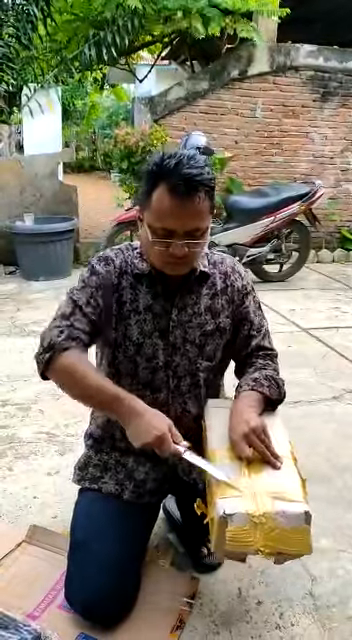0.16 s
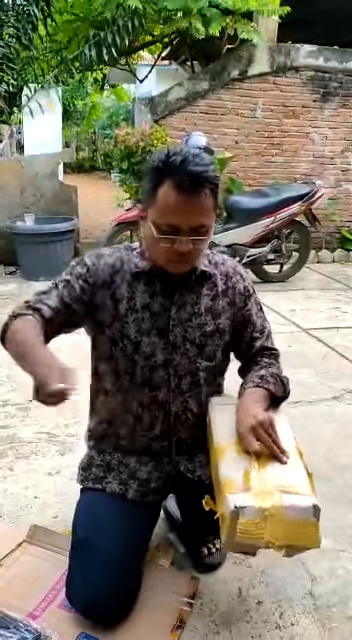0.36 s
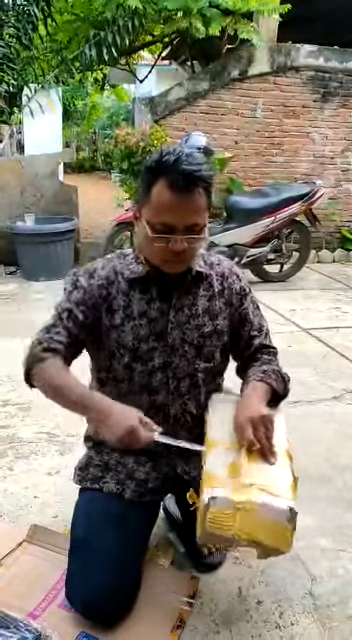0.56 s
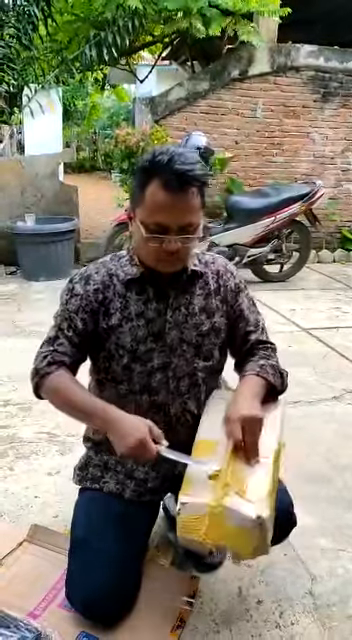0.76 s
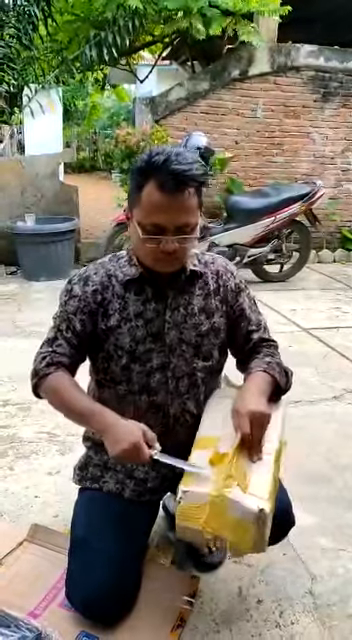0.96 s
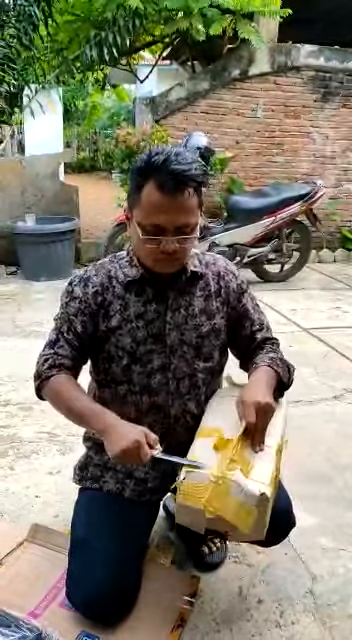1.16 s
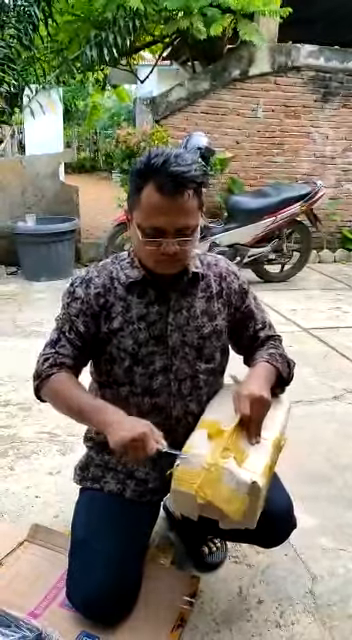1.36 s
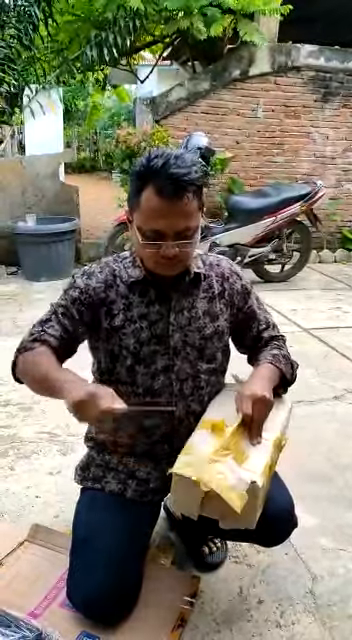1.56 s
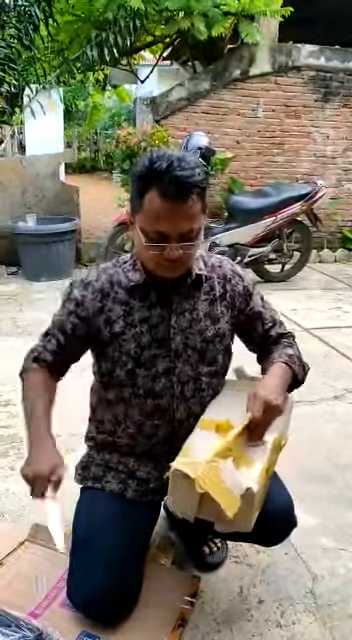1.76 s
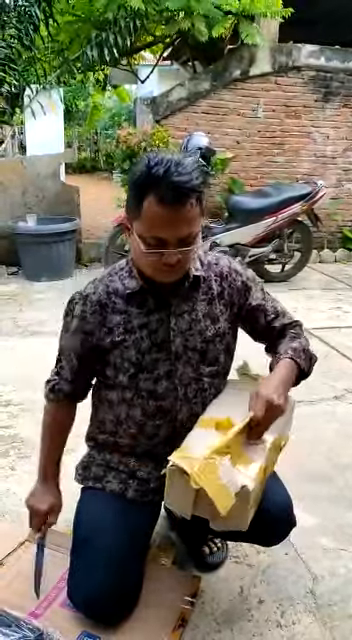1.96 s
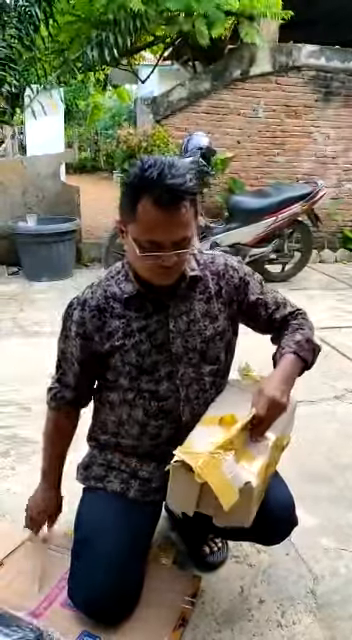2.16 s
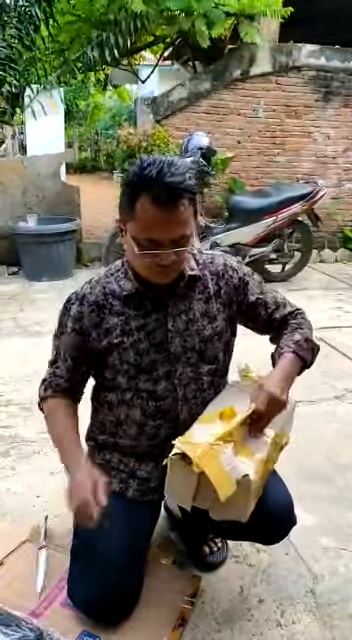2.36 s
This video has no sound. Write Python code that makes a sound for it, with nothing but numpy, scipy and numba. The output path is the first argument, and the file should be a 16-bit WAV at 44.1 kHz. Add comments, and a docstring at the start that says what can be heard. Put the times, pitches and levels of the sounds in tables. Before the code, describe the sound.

Close stereo pickup in a quiet walled yard: a blade slits box tape with a sharp hollow crack, then two lesser rasps and pops; loose tape crinkles, and the knife clacks onto cardboard.

```python
"""Small walled yard: a knife saws through the tape of a cardboard parcel in three strokes.
Filtered micro-clicks make the rasp; click-and-noise bursts make the snaps, which thump the box.
Between the strokes loose tape crinkles (sparser clicks) and flicks (short noise bursts); the box scuffs.
Then the knife goes down on flat cardboard: dull knocks of damped sines with grit.
Near scatter and wall echo are decaying noise; faint air and a low rumble lie beneath."""
import sys
import numpy as np
from scipy import signal
from scipy.fft import rfft, irfft
from scipy.io import wavfile
from scipy.ndimage import uniform_filter1d
from numba import njit

SR = 44100
rng = np.random.default_rng(int(sys.argv[2]) if len(sys.argv) > 2 else 0)


def to_wav(s):
    """Save 16-bit WAV."""
    ch = np.atleast_2d(s).T  # columns
    pcm = np.round(np.clip(ch, -1, 1) * 32767)  # PCM
    wavfile.write(sys.argv[1], SR, pcm.astype(np.int16))


N = 110250

# relative spectrum of the stiff board: f/Hz, level/dB
PANEL = [(40, -54.5), (150, -23.5), (400, -3), (560, -12.5), (780, 2), (1000, 0), (1270, 3.5), (1700, -9.5),
         (2200, -4), (3000, -9), (4200, -17), (16000, -49)]
# relative spectrum of the tape: f/Hz, level/dB
TAPE = [(200, -46.5), (1200, -11.5), (3200, -6), (4000, -11.5), (4600, -6.5), (5400, -3), (6700, 1),
        (8000, 4), (9500, -7.5), (11500, -18), (15600, -16)]
# relative spectrum of rubbed tape, its lower colour: f/Hz, level/dB
RUB = [(200, -13), (700, -28.5), (1200, 1.5), (2200, 2.5), (3000, -7.5), (4300, -8.5), (16000, -36.5)]
CUT_GRAINS_PER_S, CUT_SCATTER_DB = 5000, 4
BASS_CUT_HZ = 230  # for knocks (flat board radiates little below this) and the ring of the pops


def undb(db):
    """Decibels to gain."""
    return 10 ** (np.asarray(db) / 20)


def unit(x):
    """Scale to an rms of 1."""
    return x / np.sqrt(np.mean(x ** 2))


def along(hz, table, axis=1):
    """Read a table column on a log-frequency axis."""
    table = np.array(table, float)
    return np.interp(np.log(hz + 1), np.log(table[:, 0]), table[:, axis])


def response(points, size=2048):
    """Minimum-phase impulse response of a spectrum, by folding its cepstrum."""
    hz = np.fft.rfftfreq(size, 1 / SR)
    cepstrum = irfft(np.log(undb(along(hz, points))))
    cepstrum[1:size // 2] *= 2
    cepstrum[size // 2 + 1:] = 0
    return irfft(np.exp(rfft(cepstrum)))


def through(x, ring):
    """Convolve with a response scaled to unit energy."""
    return signal.oaconvolve(x, ring / np.linalg.norm(ring))[:N]


def high_pass(x, hz):
    """Third-order bass cut."""
    return signal.sosfilt(signal.butter(3, hz, "high", fs=SR, output="sos"), x)


def modes(rows):
    """Sum of decaying sines from rows of f/Hz, level/dB, t60/s."""
    t = np.arange(SR // 5) / SR
    return sum(undb(db) * np.sin(2 * np.pi * hz * t) * np.exp(-np.log(1000) * t / t60)
               for hz, db, t60 in rows)


def add(out, at, x, db):
    """Mix in a short sound; db is its energy spread over 5 ms."""
    i = int(at * SR)
    x = x[:N - i] * undb(db) * np.sqrt(.005 * SR) / np.linalg.norm(x)
    out[i:i + len(x)] += x


def swell(at, rise, fade):
    """Envelope climbing 20 dB in the rise time and dropping 20 dB in the fade time."""
    t = np.arange(N) / SR - at
    return undb(-20 * np.minimum(np.maximum(-t / rise, t / fade), 10))


def grains(rate, scatter_db):
    """Random tiny clicks of either sign, a few much larger than the rest."""
    size = undb(scatter_db * np.minimum(rng.exponential(size=N), 4))
    hits = rng.random(N) < rate / SR
    return unit(hits * size * rng.choice([-1, 1], N))


def catching():
    """Contact that catches and slips: random levels, briefly held and smoothed."""
    catch_per_s, catch_db = 90, 2.6  # spread before smoothing
    step = (np.arange(N) / SR * catch_per_s).astype(int)
    held = rng.standard_normal(2000)[step]
    return unit(undb(catch_db * uniform_filter1d(held, SR // 250)))


def friction(rows, rate, scatter_db, body, top):
    """Uneven swells of tiny clicks, heard in a low and a high colour."""
    low = sum(undb(db) * swell(at, rise, fade) for at, rise, fade, db, _ in rows)
    high = sum(undb(db) * swell(at, rise, fade) for at, rise, fade, _, db in rows)
    return sum(through(level * catching() * grains(rate, scatter_db), response(colour))
               for level, colour in ((low, body), (high, top)))


def snaps():
    """Tape and fibres break: each click and spray of splinters drives box, panel and tape."""
    # breaks: t/s, box thump/dB, panel pop/dB, tape crack/dB
    breaks = [(0.1945, -64.5, -74, -35), (0.2026, -45.5, -28, -22), (0.2045, -38, -27, -18.5),
              (0.2085, -38, -43, -37), (.2160, -39, -24, -58), (0.222, -32, -51, -56),
              (0.6293, -80.5, -44, -53), (0.646, -77.5, -37.5, -39), (.6570, -48.5, -36.5, -36),
              (0.6589, -43, -27.5, -31), (0.6614, -37, -33.5, -37), (.6990, -53, -43.5, -34.5),
              (1.5010, -75, -55, -39.5), (1.5168, -89.5, -43, -31), (1.5209, -60.5, -41, -27),
              (1.5484, -43, -27.5, -32.5), (1.5493, -43.5, -34.5, -47), (1.5544, -48, -40, -37),
              (1.7826, -78, -63.5, -58)]
    # air and walls of the box, before tuning and bass cut: f/Hz, level/dB, t60/s
    box_modes = [(120, -10, .07), (165, -4.5, .035), (225, 1.5, .055), (420, 7, .025)]
    # box pressed and tilted from stroke to stroke: t/s, pitch ratio, bass cut/Hz
    box_tuning = [(.21, 1, 110), (.66, .79, 190), (1.55, .95, 110)]
    # steady ringing colour that early reflections lend each pop, before bass cut: f/Hz, level/dB
    reflection_modes = [(790, -19.5), (950, -3), (1040, -4), (1185, -4), (1277, 5), (1598, -7.5),
                        (2320, 1.5)]
    reflection_t60_s, reflection_db = 0.11, -11.5  # level re pop
    splinter_s, splinter_db = 0.0018, 1  # decay; level re click

    out, t = np.zeros(N), np.arange(SR // 50) / SR
    panel, tape = response(PANEL), response(TAPE)
    reflections = modes([(hz, db, reflection_t60_s) for hz, db in reflection_modes])
    reflections = high_pass(reflections, BASS_CUT_HZ)
    tuning_t, ratios, cuts_hz = np.transpose(box_tuning)
    for at, thump_db, pop_db, crack_db in breaks:
        spray = rng.standard_normal((2, len(t))) * np.exp(-t / splinter_s)
        spray = undb(splinter_db) * spray / np.linalg.norm(spray, axis=1, keepdims=True)
        spray = spray + (t == 0)  # the click itself
        ratio = np.interp(at, tuning_t, ratios)
        cut_hz = np.interp(at, tuning_t, cuts_hz)
        box = modes([(hz * ratio, db, t60) for hz, db, t60 in box_modes])
        add(out, at, high_pass(box, cut_hz), thump_db)
        add(out, at, signal.fftconvolve(spray[0], panel), pop_db)
        add(out, at, signal.fftconvolve(spray[0], reflections), pop_db + reflection_db)
        add(out, at, signal.fftconvolve(spray[1], tape), crack_db)
    return out


def cuts():
    """Blade drags through tape and board: dense clicks coloured by both."""
    # drags: peak t/s, swell/s, fade/s, board rasp/dB, tape hiss/dB
    drags = [(.212, 0.009, 0.038, -25.5, -31), (.622, 0.069, 0.017, -70, -45.5),
             (.662, 0.04, 0.036, -52, -36.5), (1.443, 0.013, 0.029, -45, -47),
             (1.528, 0.056, 0.033, -44.5, -39.5)]
    return friction(drags, CUT_GRAINS_PER_S, CUT_SCATTER_DB, PANEL, TAPE)


@njit
def moving_band(x, hz, width):
    """State-variable band-pass with a moving centre; width is a share of the centre."""
    y, b, l = np.empty(len(x)), 0., 0.
    for i in range(len(x)):
        g = np.tan(np.pi * hz[i] / SR)
        v = (b + g * (x[i] - l)) / (1 + g * (g + width))
        b, l, y[i] = 2 * v - b, l + 2 * g * v, width * v
    return y


def slit():
    """In the second stroke the blade rasps on a resonance that falls as the slit grows."""
    # resonance track: t/s, centre f/Hz, level/dB
    track = [(0.58, 2400, -71.5), (0.602, 2000, -54.5), (0.621, 1600, -43), (0.639, 1350, -48),
             (0.646, 1150, -37), (0.666, 920, -55)]
    width = 0.8  # share of the centre, per filter pass
    t = np.arange(N) / SR
    at, hz, db = np.array(track, float).T
    centre_hz = np.interp(t, at, hz)
    rasp = grains(CUT_GRAINS_PER_S, CUT_SCATTER_DB)
    for _ in range(2):
        rasp = moving_band(rasp, centre_hz, width)
    return unit(rasp) * undb(np.interp(t, at, db, left=-np.inf, right=-np.inf))


def crinkles():
    """Loose tape crinkles under the hand: sparser clicks in a rub and a hiss."""
    # swells: peak t/s, swell/s, fade/s, rub/dB, hiss/dB
    swells = [(.175, 0.031, 0.011, -55, -50), (.49, 0.12, 0.075, -70, -58.5),
              (.91, 0.03, 0.051, -71.5, -58), (1.035, 0.11, 0.13, -81, -60),
              (1.33, 0.042, 0.043, -68.5, -63), (1.765, 0.061, 0.21, -75.5, -58),
              (1.98, 0.24, 0.23, -81.5, -67.5), (2.175, 0.21, 0.12, -59, -57)]
    grains_per_s, scatter_db = 750, 3.4
    return friction(swells, grains_per_s, scatter_db, RUB, TAPE)


def ticks():
    """Creases in loose tape flick straight: short and bright, too light to move the box."""
    # flicks: t/s, level/dB
    flicks = [(0.4433, -46), (0.487, -56), (0.8383, -56.5), (.982, -60.5), (1.03, -58.5), (1.0435, -59.5),
              (1.408, -67.5), (1.4640, -43), (1.7460, -52), (1.8544, -64.5), (1.9052, -58), (1.982, -65),
              (2.028, -54), (2.049, -57), (2.1440, -60.5), (2.174, -65), (2.285, -58)]
    tick_s, rub_db = .002, -4.5  # decay; lower colour re tape
    out, t = np.zeros(N), np.arange(SR // 50) / SR
    for at, db in flicks:
        for colour, gain_db in ((TAPE, 0), (RUB, rub_db)):
            burst = rng.standard_normal(len(t)) * np.exp(-t / tick_s)
            add(out, at, signal.fftconvolve(burst, response(colour)), db + gain_db)
    return out


def knife_down():
    """Knife lands on flat cardboard: fast-damped sines plus crushed grit."""
    # knocks, the last two 5 ms apart: t/s, level/dB, f/Hz, t60/s
    knocks = [(2.0250, -41, 694, 0.023), (2.0902, -34, 930, 0.0072), (2.0949, -44, 810, 0.0075)]
    # sheet under the knife, level re knock before bass cut: f/Hz, level/dB, t60/s
    sheet_modes = [(230, -18, .045), (1110, -19, .03)]
    grit_db, grit_s = -17, .006  # level re knock; decay
    out, t = np.zeros(N), np.arange(SR // 20) / SR
    for at, db, pitch_hz, t60 in knocks:
        knock = modes([(pitch_hz, 0, t60)] + list(sheet_modes))
        add(out, at, -high_pass(knock, BASS_CUT_HZ), db)
        grit = rng.standard_normal(len(t)) * np.exp(-t / grit_s)
        add(out, at, signal.fftconvolve(grit, response(PANEL)), db + grit_db)
    return out


def scuffs():
    """Box, flaps and sleeve rub softly: narrow bands of clicks that swell and fade."""
    # rubs: peak t/s, swell/s, fade/s, level/dB, centre f/Hz
    rubs = [(.006, 0.059, 0.006, -54, 472), (0.099, 0.0029, 0.08, -56.5, 1025),
            (.15, 0.11, 0.022, -65, 217), (.15, 0.043, 0.15, -60.5, 3260), (0.966, .08, 0.04, -66.5, 1210),
            (.99, .08, 0.085, -61.5, 3260), (1.218, 0.0072, 0.019, -62.5, 245.5),
            (2.109, 0.054, 0.14, -54.5, 717), (2.28, 0.3, 0.29, -67.5, 1103),
            (2.38, 0.037, 0.08, -64, 7570), (2.436, 0.0051, 0.07, -67.5, 904)]
    width = .22  # share of the centre, approx.
    grains_per_s, scatter_db = 1200, 2.5
    out = np.zeros(N)
    for at, rise, fade, db, hz in rubs:
        edges_hz = [hz / (1 + width / 2), hz * (1 + width / 2)]
        band = signal.butter(2, edges_hz, "band", fs=SR, output="sos")
        rub = unit(signal.sosfilt(band, grains(grains_per_s, scatter_db)))
        out += undb(db) * swell(at, rise, fade) * rub
    return out


def at_ports(x, lag_s):
    """The right port hears a sound slightly later than the left."""
    hz = np.fft.rfftfreq(N, 1 / SR)
    return np.array([x, irfft(rfft(x) * np.exp(-2j * np.pi * hz * lag_s), N)])


def nearby(x, count=7):
    """Treble scattered by box and knees, unlike at each port, shifting as box and hands move."""
    near_db, near_s, near_hz = -3.5, 0.0021, 1110  # level, decay, lower edge
    shift_per_s = 13
    t = np.arange(SR // 50) / SR
    pose, out = np.arange(N) / SR * shift_per_s, 0
    for k in range(count):  # crossfade through the noise paths in a cycle
        share = np.sqrt(np.maximum(1 - np.abs((pose - k) % count - 1), 0))
        paths = high_pass(rng.standard_normal((2, len(t))) * np.exp(-t / near_s), near_hz)
        out = out + np.array([through(x * share, path) for path in paths])
    return undb(near_db) * out


def yard(x):
    """Diffuse tail from walls and paving, alike at both ports only in the bass."""
    # echo bands: f/Hz, level re direct sound/dB, t60/s
    echo_bands = [(87, -2, 0.3), (300, -1, 0.35), (730, -11, 0.36), (1850, -7, 0.4), (6680, -5.5, 0.33),
                  (13960, -6, .3)]
    onset_s, alike_hz = 0.0012, 646
    t = np.arange(SR // 2) / SR
    hz = np.fft.rfftfreq(len(t), 1 / SR)
    shared = rfft(rng.standard_normal(len(t)))
    own = rfft(rng.standard_normal((2, len(t))))
    alike = 1 / (1 + (hz / alike_hz) ** 4)
    noise, tail = np.sqrt(alike) * shared + np.sqrt(1 - alike) * own, 0
    log_centres = np.log([row[0] for row in echo_bands])
    for share, (_, db, t60) in zip(np.eye(len(echo_bands)), echo_bands):
        band = np.interp(np.log(hz + 1), log_centres, share)
        fall = np.exp(-np.log(1000) * t / t60) * (1 - np.exp(-t / onset_s))
        tail = tail + undb(db) * irfft(noise * band, len(t)) * fall / np.linalg.norm(fall)
    return signal.fftconvolve(x[None], tail, axes=1)[:, :N]


def background():
    """Faint outdoor air and a low rumble near the end: shaped noise, slightly unlike at each port."""
    # relative spectrum of the air: f/Hz, level/dB
    air = [(20, -14), (90, -2.5), (700, -18.5), (3000, -33.5), (7000, -28.5), (16000, -38)]
    # relative spectrum of the rumble: f/Hz, level/dB
    rumble = [(20, -1), (60, 13.5), (110, 9.5), (200, -14.5), (1000, -39)]
    air_db, rumble_db = -77.5, -67.5
    peak_s, swell_s, fade_s = 2.07, 0.55, 1.7  # rumble

    def wide(spectrum):
        """Common noise plus a little of opposite sign at the two ports."""
        mid, side = (through(rng.standard_normal(N), response(spectrum)) for _ in range(2))
        return mid + 0.2 * side * np.array([[1], [-1]])

    rumbling = undb(rumble_db) * wide(rumble) * swell(peak_s, swell_s, fade_s)
    return undb(air_db) * wide(air) + rumbling


def scene():
    """Parcel and knife reach the left port first, then return from box, knees and walls."""
    parcel_lag_s, knife_lag_s = .00008, 0.00018  # the knife is put down further to the left
    parcel = snaps() + cuts() + slit() + crinkles() + ticks() + scuffs()
    knife = knife_down()
    direct = at_ports(parcel, parcel_lag_s) + at_ports(knife, knife_lag_s)
    return direct + nearby(parcel + knife) + yard(parcel + knife) + background()


def record(dry):
    """Each microphone port colours the sound in its own way; the top is cut."""
    # left minus right: f/Hz, level/dB
    port_tilt = [(100, -1), (450, 2.5), (800, 0.5), (1300, -0.5), (2200, 5.5), (3700, 5.5), (4500, 6),
                 (6600, 9), (7700, -.5), (10500, -4), (13000, 1.5), (15500, 8)]
    top_hz = 16300
    wet = []
    for x, side in zip(dry, (1, -1)):
        colour = response([(hz, side * db / 2) for hz, db in port_tilt])
        wet.append(signal.oaconvolve(x, colour)[:N])
    return signal.sosfilt(signal.ellip(8, .2, 70, top_hz, fs=SR, output="sos"), wet)


dry = scene()
out = record(dry)
to_wav(out)
```